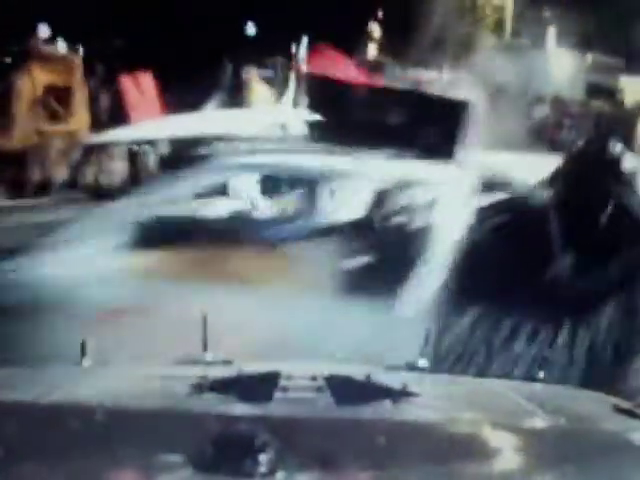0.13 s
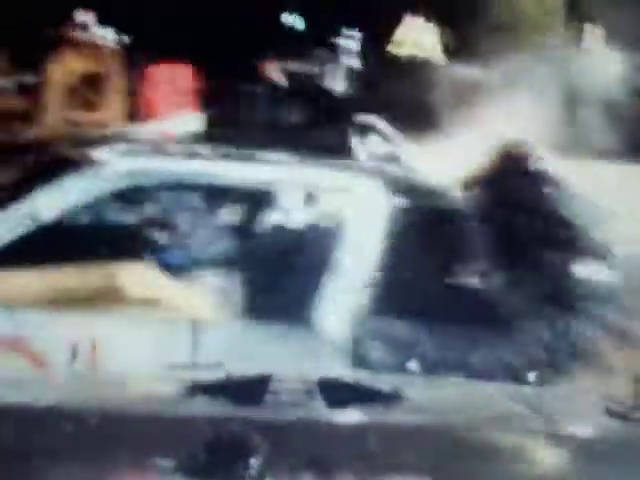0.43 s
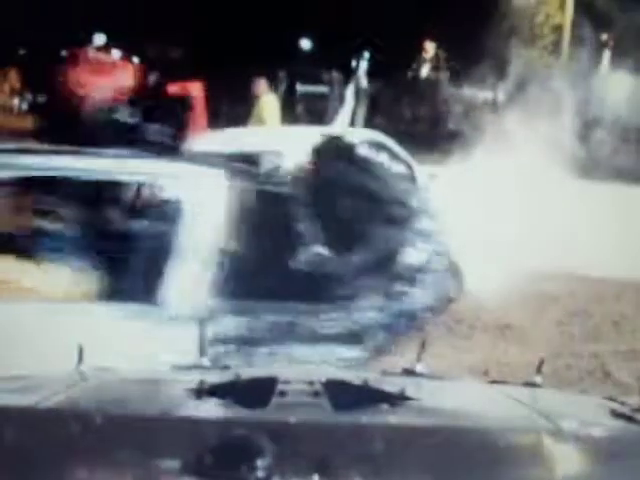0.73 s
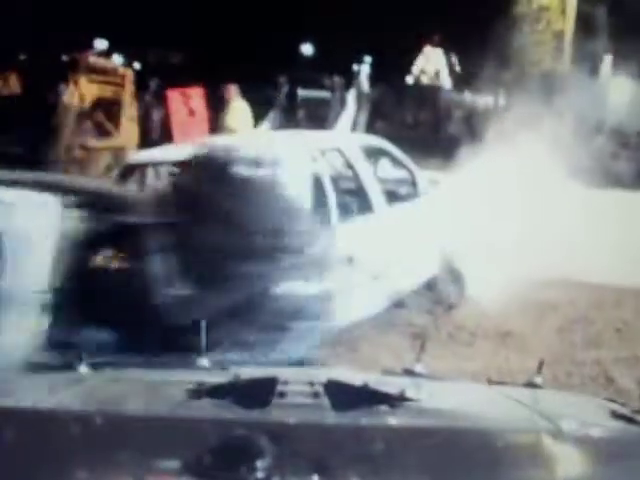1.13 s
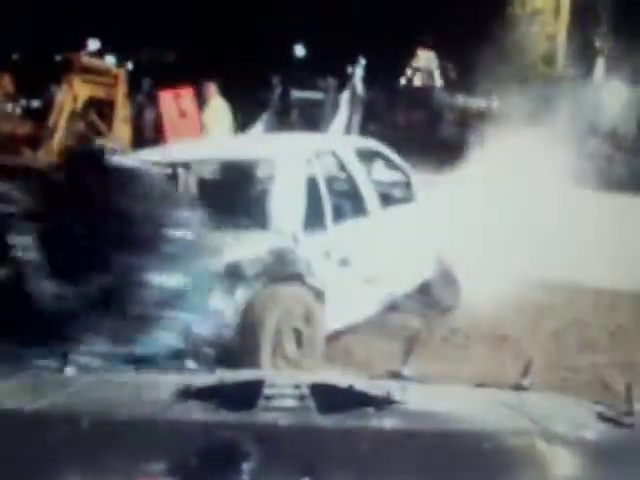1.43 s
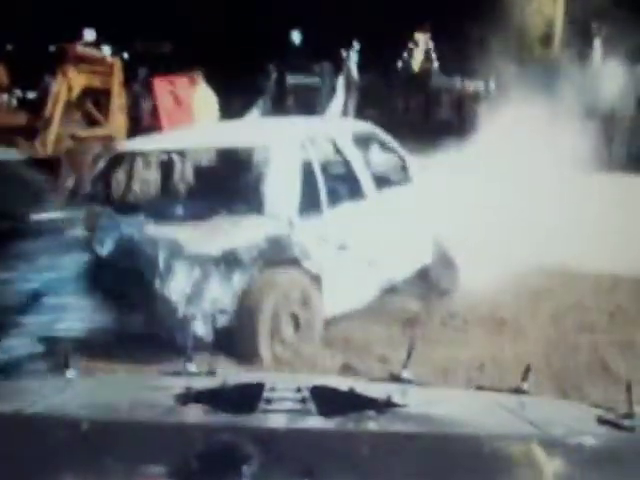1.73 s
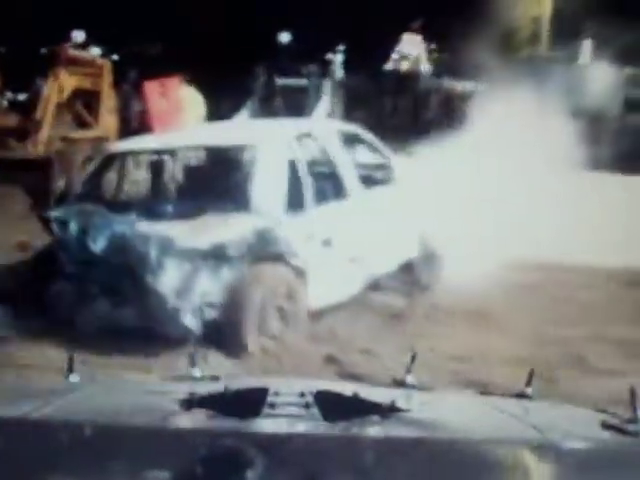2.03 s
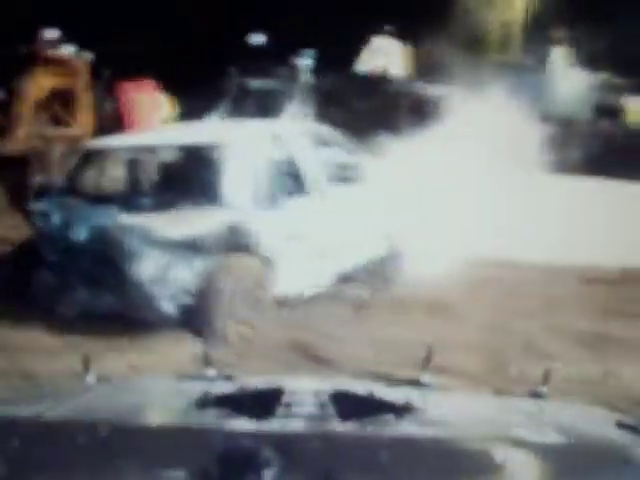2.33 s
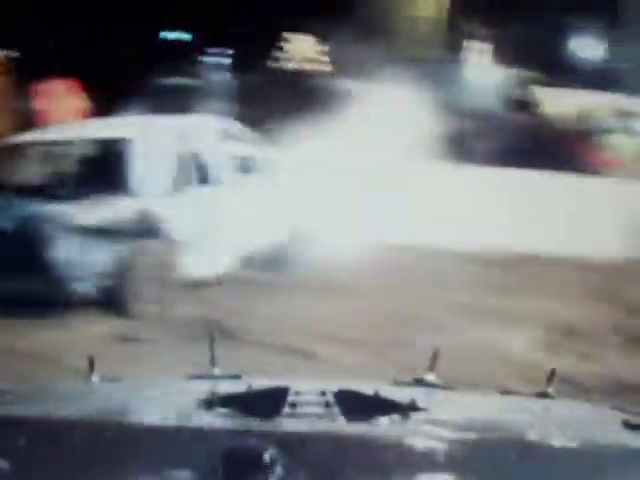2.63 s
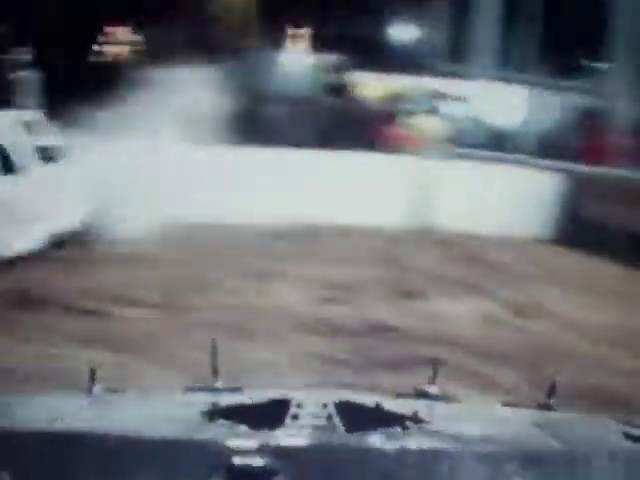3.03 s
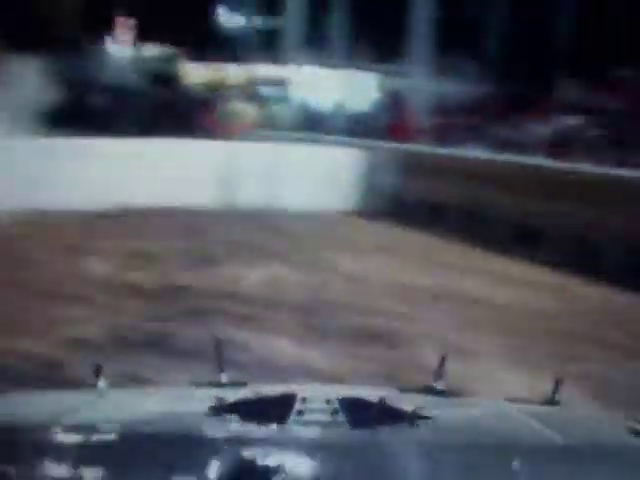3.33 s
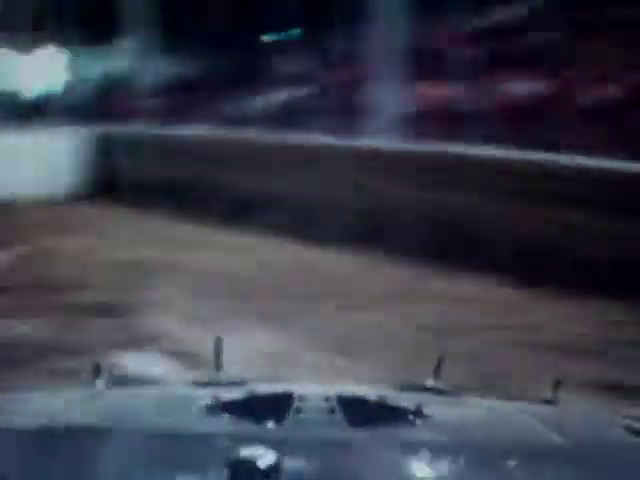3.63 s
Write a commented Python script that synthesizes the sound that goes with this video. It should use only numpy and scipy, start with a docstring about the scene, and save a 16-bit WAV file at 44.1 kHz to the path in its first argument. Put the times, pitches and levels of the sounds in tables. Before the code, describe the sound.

Loud, uneven car engines roar throughout inside a stripped derby car, a neighbouring engine growling and distant cars blurring behind. At 0.15 s a blow sets off a quick metallic clatter until about 0.4 s. The car's own engine climbs to 1.4 s, drops, then revs again to 3.1 s. Small parts clink after 2 s; heavier panel knocks follow from 3.2 s. Boxy, thin, dull, gritty sound.

```python
"""Inside a stripped derby car on a dirt arena: distant cars roar and a neighbouring engine growls throughout.
At 0.15 s the body takes a blow; the car's own uneven eight-cylinder engine revs up to 1.4 s and again to 3.1 s.
Panels rattle over ruts and loose parts clink, and the heaviest late knocks come after 3.2 s.
Engines are pulse trains through cabin filters, panels are struck resonators and distant cars are shaped noise.
A small boxed microphone thins the bass and dulls the treble; a coarse recorder's grit follows the level."""
import sys
import numpy as np
from scipy import signal
from scipy.fft import rfft, irfft, next_fast_len
from scipy.io import wavfile

SR = 44100
rng = np.random.default_rng(int(sys.argv[2]) if len(sys.argv) > 2 else 0)


def invert_db(x):
    """Field ratio 10**(x/20) for x, a level in decibels (scalar or array-like)."""
    u = np.asarray(x, float) / 20
    return 10 ** u


def output_pcm(signal):
    """Save a mono or channel-first signal as 16-bit PCM at the path in sys.argv[1].

    Samples are clipped to [-1, 1] before scaling.
    """
    pcm = np.clip(np.atleast_2d(signal).T, -1, 1) * 32767
    wavfile.write(sys.argv[1], SR, np.round(pcm).astype(np.int16))


N = 166257

# colour of cabin and microphone housing: pitch_hz, level_db (relative, per Hz)
CABIN_COLOUR = [(100, -64.5), (170, -42), (216, -43.5), (233, -28), (257, -13), (326, -4), (389, -2.5),
                (419, -4.5), (446, -1), (559, -1), (692, -4.5), (746, -2.5), (856, -2), (1090, -8.5),
                (1430, -29.5), (1580, -21.5), (1730, -26.5), (1890, -23), (2060, -30), (2390, -35),
                (2550, -29), (2850, -29), (3110, -31.5), (3400, -40.5), (4420, -86), (7480, -120)]
# speed of the neighbouring engine: start_s, cycle_hz (four-stroke cycles per s), level_db (rms)
NEAR_SPEED = [(0, 21.3, -41), (.25, 21.6, -35.5), (.5, 19.8, -45.5), (.75, 21, -34.5), (1.0, 21.55, -32.5),
              (1.2, 23.5, -36.5), (1.42, 23.3, -38.5), (1.6, 20.1, -41), (1.85, 21.6, -33),
              (2.12, 18.7, -36.5), (2.35, 19.8, -29), (2.65, 20.2, -35.5), (2.96, 20.6, -39.5),
              (3.2, 19.5, -41.5), (3.45, 21, -33), (3.77, 22.8, -39.5)]
# its cylinders in firing order: lag (shares of a firing gap), strength_db
NEAR_FIRING = [(0, 0), (.05, -2), (-.04, -1), (.05, -3), (0, 0), (-.05, -2), (.04, -3), (.02, -1)]


def rms_one(x):
    """Normalisation: scale to unit rms."""
    return x / np.sqrt(np.mean(x ** 2) + 1e-20)


def in_time(rows):
    """Linear interpolation: columns of a table joined by straight lines in time."""
    s, *columns = np.transpose(rows)
    return [np.interp(np.arange(N) / SR, s, c) for c in columns]


def coloured(x, points):
    """Minimum-phase filtering: a folded cepstrum makes the given spectrum causal."""
    size = next_fast_len(N + SR // 2) * 2
    hz, db = np.transpose(points)
    bin_hz = np.arange(size // 2 + 1) * SR / size
    gain_db = np.interp(np.log(bin_hz + 1), np.log(hz), db)
    cepstrum = irfft(np.log(invert_db(gain_db)), size)
    cepstrum[1:size // 2] *= 2
    cepstrum[size // 2 + 1:] = 0
    response = np.exp(rfft(cepstrum))
    return irfft(rfft(x, size) * response, size)[:N]


def decay(x, seconds):
    """Exponential relaxation: one-pole smoothing with the given time constant."""
    r = np.exp(-1 / (seconds * SR))
    return signal.lfilter([1 - r], [1, -r], x + 1e-18)


def slow_noise(corner_hz):
    """Random modulation: noise through two equal one-pole low-passes, at unit rms."""
    time_constant = 1 / (2 * np.pi * corner_hz)
    return rms_one(decay(decay(rng.standard_normal(N), time_constant), time_constant))


def far_cars():
    """Incoherent superposition: many unresolved engines merge to noise whose level flutters."""
    # rms before the flutter: start_s, level_db
    roar = [(0, -29), (.5, -38.5), (1.2, -36), (1.55, -38.5), (2.4, -33.5), (2.97, -40), (3.15, -35.5),
            (3.77, -35)]
    # chassis clatter lifts the treble: pitch_hz, level_db
    clatter_tilt = [(300, -1), (1200, 0), (1600, 4), (3500, 2.5)]
    flutter_db = 1.5 * slow_noise(14)
    noise = coloured(rng.standard_normal(N), CABIN_COLOUR)
    return invert_db(in_time(roar)[0] + flutter_db) * rms_one(coloured(noise, clatter_tilt))


def near_drone():
    """Harmonic radiation: the exhaust of the neighbour drones at twice its firing rate while it pulls."""
    # rms before the waver: start_s, level_db
    strength = [(0, -57.5), (.65, -55), (.8, -43.5), (1.05, -43), (1.35, -44.5), (1.5, -55), (2.08, -53.5),
                (2.2, -45.5), (2.6, -44.5), (3.0, -46), (3.3, -46.5), (3.55, -44), (3.77, -49)]
    waver_db = 4.5 * slow_noise(12)
    cycles = np.cumsum(in_time(NEAR_SPEED)[0]) / SR
    turns = cycles * len(NEAR_FIRING) * 2
    return invert_db(in_time(strength)[0] + waver_db) * np.sqrt(2) * np.sin(2 * np.pi * turns)


def cabin(x):
    """Multiple reflection: all-pass echoes from bare sheet metal smear each pulse."""
    # delays of the echoes: path_s
    paths = [.0009, .0017, .0029]
    reflects = .4
    for path_s in paths:
        gap = np.zeros(int(path_s * SR) - 1)
        x = signal.lfilter(np.r_[-reflects, gap, 1], np.r_[1, gap, -reflects], x)
    return x


def engine(speed, rough, ailing_db, cylinders, first_due_s):
    """Periodic excitation: each firing gives a pulse and turbulent gas; unevenness scatters time and strength."""
    spread_db, jitter_gaps = 5.5, .08  # standard deviations at unevenness 1
    pulse_smooth_s, puff_decay_s = .0001 / 4, .002
    puff_db = -8  # puffs relative to pulses at unevenness 0.5
    cycle_hz, level_db = in_time(speed)
    lag, strength_db = np.transpose(cylinders)

    # turns counts firings from the moment at which the first cylinder is due
    turns = np.cumsum(cycle_hz) / SR * len(lag)
    turns = turns - turns[int(first_due_s * SR)]
    firing = np.arange(-800, 800)
    cylinder = firing % len(lag)
    chance = rng.standard_normal((len(firing), 2))
    unevenness = np.interp(firing, turns, rough)
    due = firing + lag[cylinder] + jitter_gaps * unevenness * chance[:, 0]
    firing_db = strength_db[cylinder] + spread_db * unevenness * chance[:, 1]
    firing_db += (cylinder == 0) * np.interp(firing, turns, ailing_db)

    inside = (due > turns[0]) & (due < turns[-1])
    at_sample = np.interp(due, turns, np.arange(N)).astype(int)
    clicks = np.zeros(N)
    np.add.at(clicks, at_sample[inside], invert_db(firing_db[inside]))
    pulses = rms_one(decay(clicks, pulse_smooth_s))
    turbulence = decay(rng.standard_normal(N), pulse_smooth_s)
    puffs = rms_one(decay(clicks, puff_decay_s) * turbulence)
    exhaust = cabin(pulses + invert_db(puff_db) * 2 * rough * puffs)
    return invert_db(level_db) * rms_one(coloured(exhaust, CABIN_COLOUR))


def near_engine():
    """Pulse-train excitation: the neighbouring car fires more evenly while it pulls."""
    # state of its firing: start_s, unevenness (0-1)
    roughness = [(0, .45), (.6, .45), (.75, .35), (1.4, .35), (1.55, .45), (2.05, .45), (2.2, .3),
                 (3.1, .3), (3.77, .35)]
    return engine(NEAR_SPEED, in_time(roughness)[0], np.zeros(N), NEAR_FIRING, 1.4)


def clinks():
    """Damped free vibration: each small loose part gives one short high ring."""
    # single rings: start_s, level_db (before rise and decay), pitch_hz
    rings = [(1.986, -38, 2743), (2.246, -46, 2662), (2.399, -33.5, 2640), (2.651, -33, 2780),
             (2.717, -41, 2832), (3.337, -36, 2440), (3.614, -37, 2830), (3.626, -42.5, 2895),
             (3.682, -26.5, 2740), (3.692, -34, 2750), (3.74, -45, 2598), (3.752, -40, 2940)]
    rise_s, t60_s = .002, .022
    t, out = np.arange(N) / SR, np.zeros(N)
    for start_s, level_db, hz in rings:
        age = np.clip(t - start_s, 0, 1)
        envelope = invert_db(level_db - 60 * age / t60_s) * (1 - np.exp(-age / rise_s))
        out += envelope * np.sin(2 * np.pi * hz * age)
    return out


def rattle_contacts():
    """Random impact process: each rattle is a swelling and fading run of uneven contacts."""
    # runs: start_s, length_s, level_db, brightness_db (added for the high panel modes)
    rattles = [(0.153, .04, -23.5, 8.5), (0.186, .09, -31, 7.5), (.305, .035, -23.5, -1.5),
               (0.344, .015, -24, 2), (0.387, .02, -34, 13), (1.061, .036, -31, 5.5),
               (1.102, .012, -33.5, 12), (1.27, 0.01, -33.5, 2), (2.289, 0.58, -31.5, -5),
               (2.491, .022, -38, 13), (3.243, .24, -28, -2), (3.4, 0.012, -27.5, 3),
               (3.433, .025, -22, -5), (3.724, 0.023, -22, 1.5)]
    contacts_per_s, per_contact_db = 3500, -15.5
    t = np.arange(N) / SR
    touch = (rng.random(N) < contacts_per_s / SR) * rng.choice([-1, 1], N)
    touch = touch * invert_db(2 * rng.standard_normal(N))
    dull, bright = np.zeros(N), np.zeros(N)
    for start_s, length_s, level_db, brightness_db in rattles:
        progress = np.clip((t - start_s) / length_s, 0, 1)
        run = touch * np.sqrt(np.sin(np.pi * progress).clip(0))
        # equal energy per expected contact
        run = run * np.sqrt(contacts_per_s * length_s / (np.sum(run ** 2) + 1e-9))
        dull += invert_db(level_db + per_contact_db) * run
        bright += invert_db(level_db + per_contact_db + brightness_db) * run
    return dull, bright


def body():
    """Modal synthesis: rattles and single knocks excite the damped modes of the panels."""
    # panel modes: pitch_hz, level_db, t60_s
    panels = [(514, -10, 0.024), (675, -17.5, .03), (739.6, -6, 0.035), (836, -3.5, 0.033), (889, -9, .03),
              (983, -12, .03), (1078, -12.5, .03), (1620, -21, 0.039), (1916, -17.5, 0.017),
              (2390, -29, 0.1), (2500, -31.5, 0.071), (2813, -25, .036), (3107, -27.5, 0.023),
              (3580, -36, 0.022)]
    # single contacts: start_s, level_db, brightness_db (added for the high panel modes)
    knocks = [(.1536, -16, 9), (.1572, -12, -1), (.1655, -10, 0), (.1755, -12, 1), (.1865, -14, 1),
              (.2005, -14.5, 0.5), (.2145, -14, -1.5), (.2285, -14, -2), (.2405, -17.5, -1),
              (.3012, -17, -7), (.3115, -16, -8.5), (.3285, -13.5, -8), (.5612, -19, -8),
              (.5892, -17, -4.5), (1.8675, -14.5, -7), (2.0625, -14.5, -2), (3.0012, -17.5, -7.5),
              (3.2675, -12.5, -5.5), (3.2825, -12, -4.5), (3.3145, -11.5, -9.5), (3.3655, -10.5, -15),
              (3.4385, -12.5, -12), (3.4465, -9, -10)]
    bright_above_hz, soft_contact_hz, hard_contact_hz = 1400, 1150, 3700
    dull, bright = rattle_contacts()
    out = np.zeros(N)
    at_s, knock_db, knock_bright_db = np.transpose(knocks)
    spread_db = 2 * rng.standard_normal((len(knocks), len(panels)))  # from mode to mode
    for k, (hz, db, t60_s) in enumerate(panels):
        high = hz > bright_above_hz
        contacts = (bright if high else dull) * invert_db(db) * rng.choice([-1, 1], N)
        hit_db = db + knock_db + high * knock_bright_db + spread_db[:, k]
        contacts[(at_s * SR).astype(int)] += (-1) ** k * invert_db(hit_db)

        # the finite time of contact limits the treble
        edge_hz = hard_contact_hz if high else soft_contact_hz
        contacts = signal.sosfilt(signal.butter(4, edge_hz, fs=SR, output="sos"), contacts + 1e-18)
        r, w = invert_db(-60 / (t60_s * SR)), 2 * np.pi * hz / SR
        poles = [1, -2 * r * np.cos(w), r * r]
        out += signal.lfilter([np.sin(w) / 2, 0, -np.sin(w) / 2], poles, contacts + 1e-18) / np.sin(w)
    return signal.sosfilt(signal.butter(4, 450, "high", fs=SR, output="sos"), out)


def own_engine():
    """Cyclic irregularity: eight cylinders fire in turn, and one ailing cylinder fires at another strength."""
    # speed: start_s, cycle_hz (four-stroke cycles per s), level_db (rms)
    speed = [(0, 15.6, -30.5), (.14, 15.3, -35.5), (.3, 15.1, -46.5), (.45, 15.1, -37), (.7, 16.5, -31),
             (.85, 16.8, -34), (1.09, 17.65, -32), (1.26, 17.9, -32), (1.40, 18.1, -31.5),
             (1.45, 17.8, -37.5), (1.62, 15.5, -41), (1.65, 15.4, -32.5), (1.78, 15.4, -31),
             (1.98, 15.7, -31), (2.27, 17.2, -30.5), (2.5, 17.9, -29), (2.71, 18.7, -29.5),
             (2.85, 18.95, -31.5), (3.0, 19.2, -33), (3.22, 19.2, -30.5), (3.36, 18.9, -30.5),
             (3.6, 18.7, -30.5), (3.77, 18.5, -32)]
    # cylinders in firing order: lag (shares of a firing gap), strength_db
    cylinders = [(.1, 0), (.25, -3), (.05, 0), (.12, -2), (.18, 0), (-.08, -2), (.0, 0), (-.15, -2)]
    # state of its firing: start_s, unevenness (0-1), ailing_db (added to the first cylinder)
    roughness = [(0, .5, -6), (.5, .45, -10), (.8, .35, -5), (1.3, .3, -9), (1.7, .5, -3), (2.5, .45, -2),
                 (2.93, .3, -5), (2.98, .22, -30), (3.11, .22, -25), (3.2, .3, -10), (3.3, .4, -4),
                 (3.77, .5, -3)]
    return engine(speed, *in_time(roughness), cylinders, 2.986)  # s, the ailing cylinder is due


def exhaust_pipe(x):
    """Resonance: a moving pipe mode sings under load, added to the sound that passes."""
    # mode: start_s, pitch_hz, share_db (share added)
    mode = [(0, 850, -5), (.6, 840, -12), (1.1, 930, -2), (1.5, 917, -13), (2.0, 884, -5),
            (2.35, 868, -2.5), (2.65, 930, 3), (2.9, 893, -13), (3.77, 897, -13)]
    width_hz = 42
    hz, share_db = in_time(mode)
    # shift the mode to 0 Hz, smooth there, shift back
    turn = np.exp(2j * np.pi * np.cumsum(hz) / SR)
    ring = decay(x / turn, 1 / (np.pi * width_hz)) * turn
    return x + invert_db(share_db) * 2 * np.real(ring)


def cabin_notches(x):
    """Destructive interference: narrow cancellations in the cabin."""
    # cancellations: pitch_hz, width_hz, depth_db
    dips = [(686.4, 20, 13), (1448, 76, 7), (1673, 40, 6), (2022, 110, 11.5), (2240, 19, 6), (2350, 71, 8),
            (3270, 110, 10.5)]
    for hz, width_hz, depth_db in dips:
        w, a = 2 * np.pi * hz / SR, np.pi * width_hz / SR
        left = a * invert_db(-depth_db)
        x = signal.lfilter([1 + left, -2 * np.cos(w), 1 - left], [1 + a, -2 * np.cos(w), 1 - a], x)
    return x


def scene():
    """Superposition: all sources as they reach the microphone."""
    engines = exhaust_pipe(own_engine() + near_engine())
    mix = engines + near_drone() + far_cars() + body() + clinks()
    return cabin_notches(mix)[None]


def recorder_grit(dry):
    """Signal-dependent noise: grit grows with the smoothed magnitude, over a steady hiss."""
    # colour of grit and hiss: pitch_hz, level_db
    grit_colour = [(20, 1), (70, 6), (150, 12), (250, 22.5), (1000, 10.5), (3800, -1), (5000, -0.5),
                   (7300, 1.5), (8000, -2.5), (8500, -14), (9000, -44.5)]
    grit_db, follows, hiss_db = -32, 0.86, -73.5  # levels before colouring; exponent of the swing
    size = decay(np.abs(dry[0]), 0.00038)
    mean = np.sqrt(np.mean(dry ** 2))
    strength = invert_db(grit_db) * mean * (size / mean) ** follows + invert_db(hiss_db)
    return coloured(strength * rng.standard_normal(N), grit_colour)


def sampling_whine():
    """Sampling image: a faint steady high whine and its mirror tone, left by the recorder's 16 kHz sampling."""
    # whine and its mirror about 8 kHz: pitch_hz, level_db (rms)
    tones = [(7827, -84), (8172, -88)]
    t = np.arange(N) / SR
    return sum(invert_db(db) * np.sqrt(2) * np.sin(2 * np.pi * hz * t) for hz, db in tones)


def roll_off(x):
    """The treble ends steeply here."""
    return signal.sosfilt(signal.butter(12, 8950, fs=SR, output="sos"), x)


def record(dry):
    """Additive noise: the recorder adds grit, hiss and a faint whine."""
    mix = dry + recorder_grit(dry) + sampling_whine()
    return roll_off(mix)


dry = scene()
out = record(dry)
output_pcm(out)
```